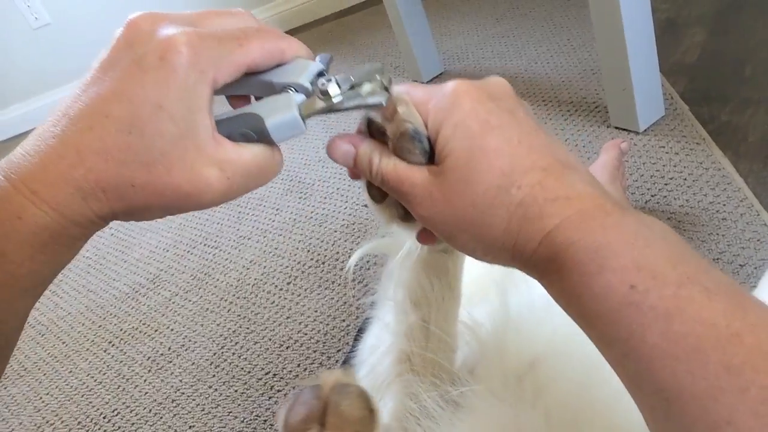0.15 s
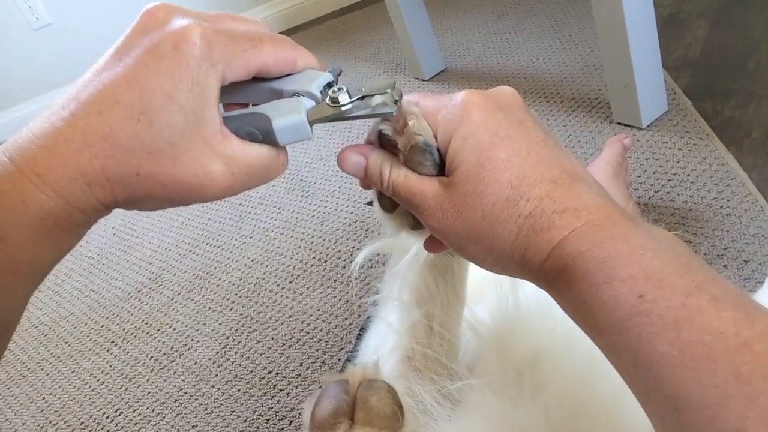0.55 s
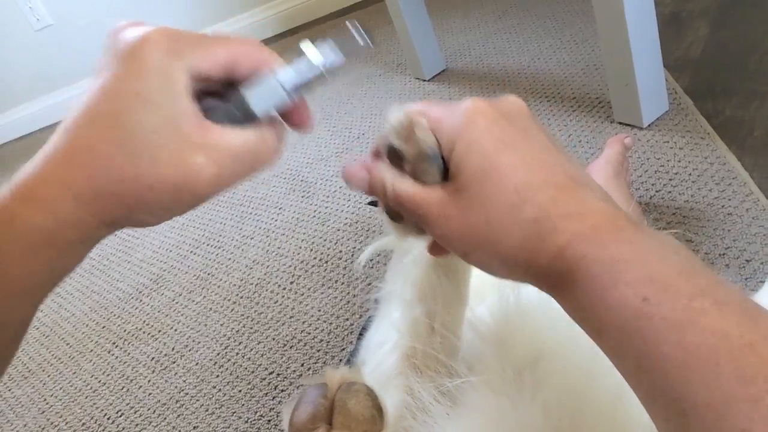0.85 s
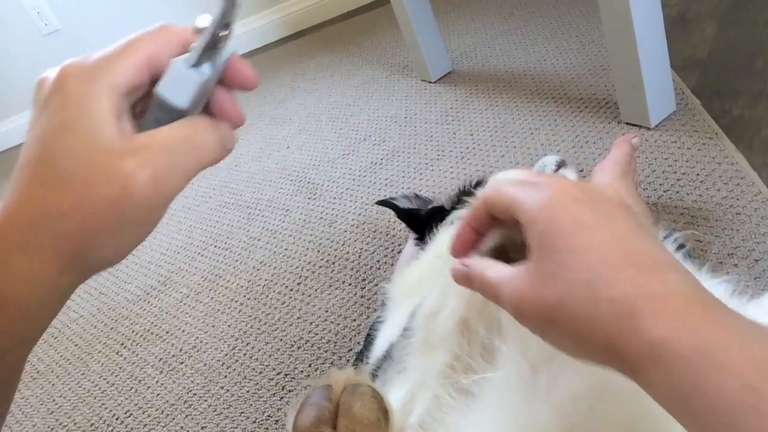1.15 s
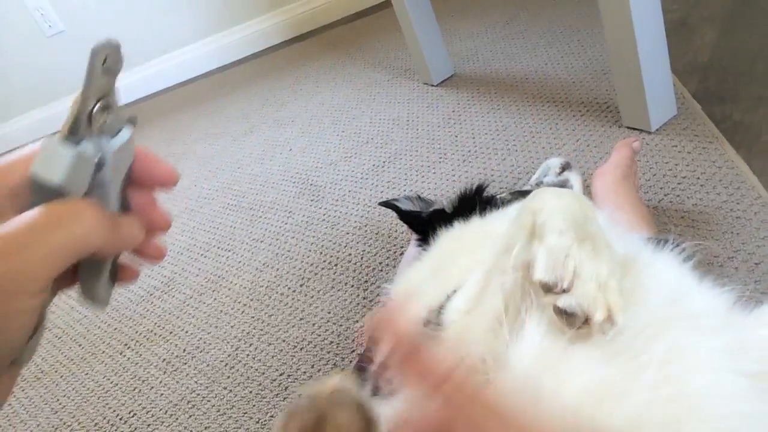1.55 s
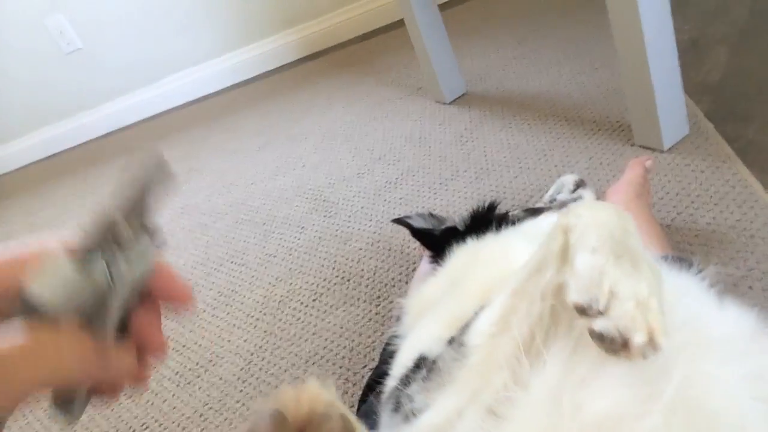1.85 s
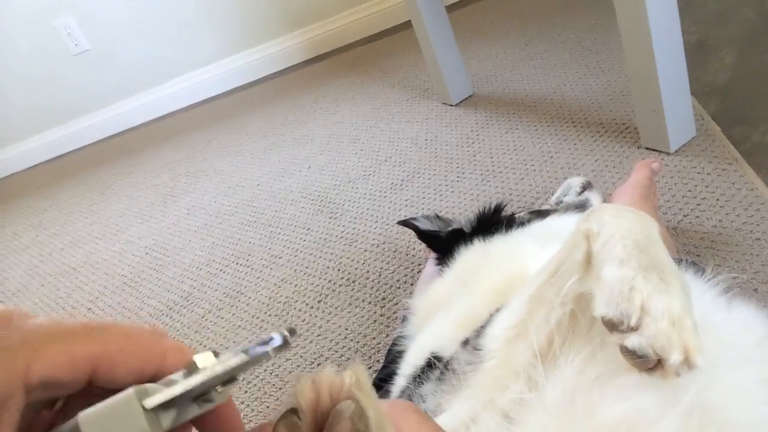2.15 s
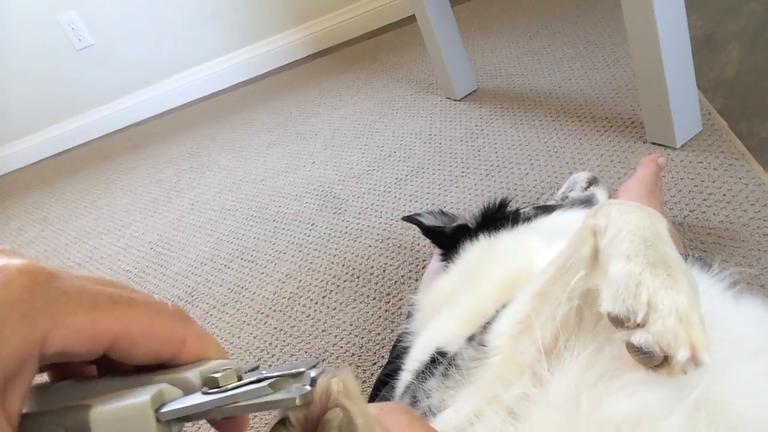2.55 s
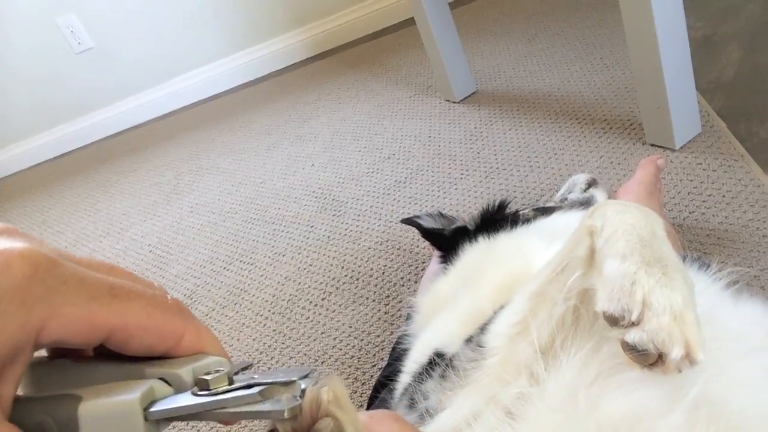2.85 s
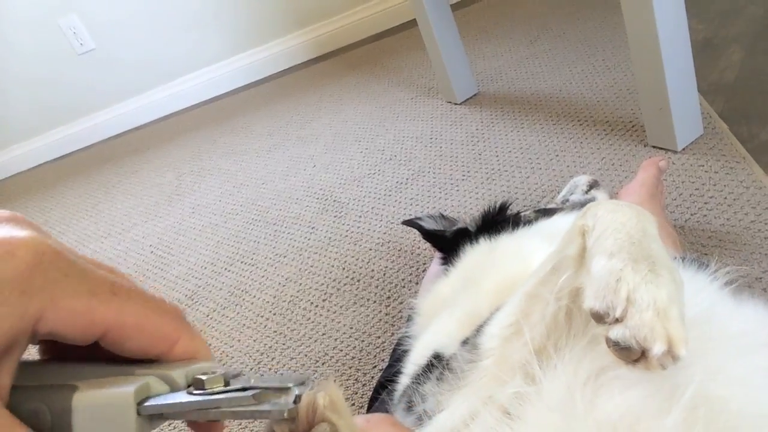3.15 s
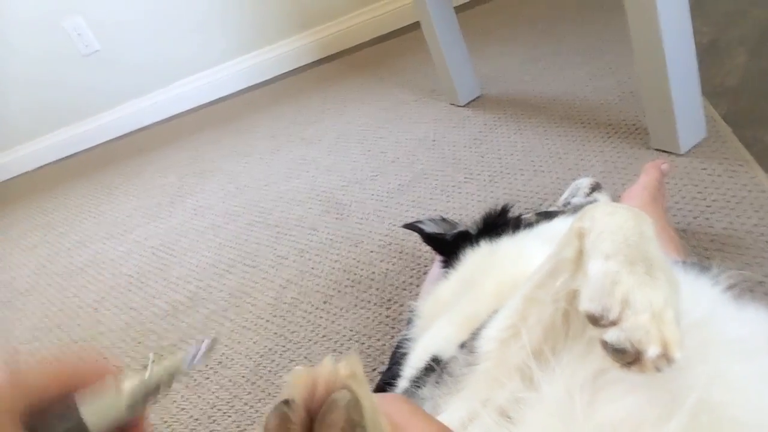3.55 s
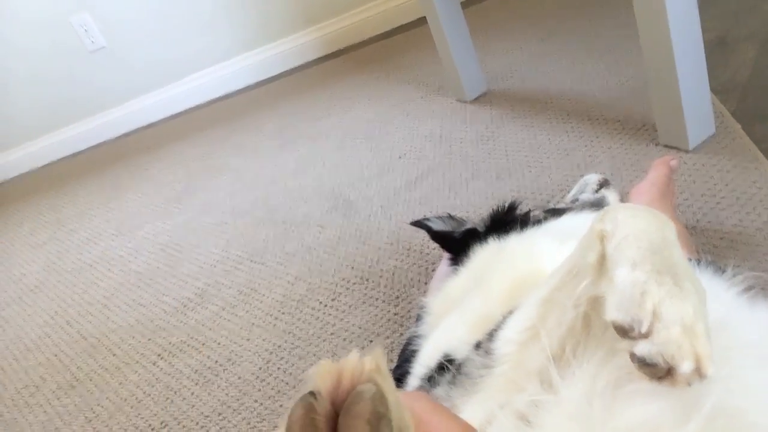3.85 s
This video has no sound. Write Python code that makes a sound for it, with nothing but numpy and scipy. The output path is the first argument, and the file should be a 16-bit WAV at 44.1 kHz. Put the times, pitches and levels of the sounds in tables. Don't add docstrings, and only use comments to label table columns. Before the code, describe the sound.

Pet nail clippers close to a phone: one small bright snip, hands brushing fur, near quiet, a hard crunchy clip with a steel snap, then a dull thud and clack on the carpeted floor, over faint house hum.

```python
import sys
import numpy as np
from scipy import signal
from scipy.fft import rfft, irfft
from scipy.io import wavfile
from scipy.ndimage import uniform_filter1d

SR = 44100
rng = np.random.default_rng(int(sys.argv[2]) if len(sys.argv) > 2 else 0)


def int16_out(signal):
    q = np.round(np.clip(np.atleast_2d(signal).T, -1, 1) * 32767)
    wavfile.write(sys.argv[1], SR, q.astype(np.int16))


def amplitude_ratio(level_db):
    exponent = np.asarray(level_db, float) / 20
    return 10 ** exponent


N = 176400


def band(x, hz, width_hz):
    return signal.lfilter(*signal.iirpeak(hz, hz / width_hz, fs=SR), x)


def band_twice(x, hz, width_hz):
    return band(band(x, hz, width_hz), hz, width_hz)


def unit(x):
    return x / np.sqrt(np.mean(x ** 2))


def walk(rate_hz):
    hold = int(SR / rate_hz)
    steps = np.repeat(rng.standard_normal(N // hold + 1), hold)
    return 1.58 * uniform_filter1d(uniform_filter1d(steps, hold), hold)[:N]


def curve(points):
    return np.interp(np.arange(N) / SR, *np.array(points).T)


def coloured(points):
    hz, db = np.array(points).T
    f = np.maximum(np.arange(N // 2 + 1) * SR / N, 1)
    gain = amplitude_ratio(np.interp(np.log(f), np.log(hz), db))
    return unit(irfft(rfft(rng.standard_normal(N)) * gain, N))


def add(out, s, peak_db, shape):
    i = int(s * SR)
    out[i:i + len(shape)] += (amplitude_ratio(peak_db) * shape / np.abs(shape).max())[:N - i]


WAVER_DB = 1.5

# f/Hz, density/dB per Hz
FLOOR_SPECTRUM = [(12, -39), (25, -18), (64, -1), (144, -0.5), (282, -13.5), (315, -11), (834, -18.5),
                  (1040, -19.5), (15500, -37)]
# f/Hz, width/Hz, level/dB
HUM_MODES = [(74.6, 46, -80), (142.4, 30, -76), (200, 25, -82.5), (318.6, 38, -80), (581, 90, -81.5),
             (431, 140, -85.5)]
# t/s, level/dB
TRAFFIC = [(0.0, -78), (0.77, -71.5), (1.17, -73), (1.27, -71.5), (1.79, -72.5), (2.23, -69.5),
           (2.58, -73.5), (3.22, -68), (3.42, -73), (3.64, -69), (3.85, -71), (4.0, -68.5)]


def house():
    floor_db = -69 - 2.0
    out = coloured(FLOOR_SPECTRUM) * amplitude_ratio(floor_db + .5 * walk(2.3))
    swell_db = curve(TRAFFIC)
    swell_db = swell_db - swell_db.mean()
    for hz, width_hz, db in HUM_MODES:
        hum = unit(band(rng.standard_normal(N), hz, width_hz))
        out = out + hum * amplitude_ratio(db + WAVER_DB * walk(3.93) + (hz < 250) * swell_db)
    t = np.arange(SR // 2) / SR
    ping_hz, ping_t60_s, beat_hz, beat_depth = 588, .9, 12.5, .7
    beat = 1 - beat_depth * np.cos(2 * np.pi * beat_hz * t)
    decay = np.minimum(t / 0.0107, 1) * amplitude_ratio(-60 * t / ping_t60_s)
    add(out, 1.365, -66, np.sin(2 * np.pi * ping_hz * t) * beat * decay)
    return out


# f/Hz, t60/s, level/dB
ROOM_BANDS = [(294, 0.23, -32), (900, 0.16, -42), (2300, 0.44, -33), (4800, 0.44, -42), (7000, 0.39, -40),
              (10000, 0.33, -39), (13000, .33, -40)]


def room(x):
    gap_s = 0.0023
    t = np.arange(SR // 2) / SR
    tail = np.zeros(len(t))
    for hz, t60_s, db in ROOM_BANDS:
        noise = band(band(rng.standard_normal(len(t)), hz, hz * 1.16), hz, hz * 1.03)
        tail += unit(noise) * amplitude_ratio(db - 22.0 - 60 * t / t60_s)
    return signal.fftconvolve(x, tail * np.clip(t / gap_s - 1, 0, 1))[:N]


# t/s, level/dB
HAND_LEVEL = [(0, -87.5), (.6, -85.5), (.9, -79), (1.1, -75.5), (1.35, -76), (1.55, -73.5), (1.7, -75.5),
              (1.9, -79.5), (2.2, -85), (2.5, -89), (3.1, -85), (3.5, -76), (3.9, -82)]
# f/Hz, density/dB per Hz
FUR_SPECTRUM = [(400, -21), (800, -4), (1200, -4), (2500, -13), (7600, -9.5), (8500, -14.5), (15000, -16.5),
                (16000, -33.5)]
# t/s, length/s, level/dB, f/Hz, width/Hz
STROKES = [(0.858, 0.029, -87, 4480, 1500), (1.011, 0.013, -81, 4700, 700), (1.118, 0.038, -85, 7000, 9000),
           (1.22, .03, -76, 1610, 1500), (1.45, 0.03, -78, 1050, 400), (1.551, 0.05, -75, 3500, 3000),
           (1.332, 0.063, -79, 4490, 5000), (.78, .025, -80, 1082, 500), (1.748, 0.0091, -72, 8400, 9000),
           (1.758, 0.04, -78.5, 2500, 3000), (1.88, .04, -88, 6000, 5000), (2.11, 0.059, -76, 6500, 3000),
           (2.1, 0.056, -86, 11500, 4000), (3.512, 0.0176, -91, 11550, 4000),
           (3.499, 0.049, -79.5, 2230, 1215), (3.679, 0.079, -79, 800, 1000)]


def rustle():
    hiss = coloured(FUR_SPECTRUM) * amplitude_ratio(curve(HAND_LEVEL) + .6 * WAVER_DB * walk(60))
    grain = amplitude_ratio(1.4 * WAVER_DB * walk(200))
    t = np.arange(-SR // 4, SR // 4) / SR
    strokes = np.zeros(N)
    for s, length_s, db, hz, width_hz in STROKES:
        noise = unit(band_twice(rng.standard_normal(len(t)), hz, width_hz))
        add(strokes, s + t[0], db + 8.5, noise * np.exp(-.5 * (t / length_s) ** 2))
    return hiss + strokes * grain


# t/s, peak/dB, f/Hz, width/Hz
TICK_EVENTS = [(.133, -47.5, 1020, 630), (.133, -55, 3500, 1500), (.728, -53, 6500, 5000),
               (.8555, -57.5, 8500, 8000), (.8597, -62, 10500, 5000), (.871, -62, 7500, 7000),
               (.881, -65.5, 2100, 900), (.886, -60, 6000, 7000), (.8985, -53, 5660, 1500),
               (.8983, -50, 10500, 5000), (.8985, -57, 1600, 900), (.9018, -58, 10000, 4000),
               (2.444, -50.5, 1060, 794), (3.086, -62, 6500, 4000), (3.13, -63, 6000, 3978),
               (3.174, -60, 6200, 3000), (3.2483, -63, 8000, 8000), (3.2515, -59, 1100, 900),
               (3.256, -61.5, 1500, 900), (3.667, -47.5, 7680, 1600), (3.667, -54, 10450, 2500),
               (3.667, -57, 4300, 2200), (3.6669, -46, 1040, 1308), (3.9525, -57.5, 3800, 3000),
               (3.971, -56.5, 3500, 3500), (3.9819, -21, 1750, 1150), (3.9824, -25.5, 1000, 1100),
               (3.982, -30.5, 3000, 1500), (3.982, -33, 4600, 1200), (3.9925, -41, 3500, 1200),
               (3.982, -23.5, 6800, 3000), (3.982, -26.5, 11200, 3000)]


def ticks():
    grit_db, grit_s, clean_above_db = -14, .0004, -40
    out, k = np.zeros(N), np.arange(800)
    click = k == 0
    for s, db, hz, width_hz in TICK_EVENTS:
        grit = amplitude_ratio(grit_db) * rng.standard_normal(800) * np.exp(-k / SR / grit_s)
        add(out, s, db, band_twice(click + (db < clean_above_db) * grit, hz, width_hz))
    return out


# t/s, peak/dB, f/Hz
THUD_EVENTS = [(3.955, -16.5, 448), (3.9647, -30, 417), (3.9705, -35, 540), (3.9727, -33, 520),
               (3.976, -41, 490), (3.9841, -19.5, 399), (3.995, -30.5, 700), (3.285, -52, 74),
               (3.943, -58, 520), (3.9502, -52, 490), (3.9573, -33, 450), (3.9903, -36, 218),
               (3.9552, -32, 213), (3.983, -55.5, 320), (3.9535, -42, 763)]


def thuds():
    width_cycles, lead_cycles = 0.48, .05
    rumble_db, rumble_t60_s = -31.5, 0.074
    out, t = np.zeros(N), np.arange(-SR // 40, SR // 10) / SR
    for s, db, hz in THUD_EVENTS:
        cycles = t * hz
        push = -np.cos(2 * np.pi * cycles) * np.exp(-.5 * ((cycles + lead_cycles) / width_cycles) ** 2)
        rumble = unit(band_twice(rng.standard_normal(len(t)), hz, 400))
        decay = np.clip(cycles, 0, 1) ** 2 * amplitude_ratio(rumble_db - 60 * np.abs(t) / rumble_t60_s)
        add(out, s + t[0], db, push + rumble * decay)
    return out


def struck(events, modes, grip_s):
    rise_s, splinter_db, splinter_s = .0004, -11.5, 0.00051
    out, t = np.zeros(N), np.arange(2000) / SR
    hz, db, t60_s = np.array(modes).T[:, :, None]
    sign = (-1.) ** np.arange(len(hz))[:, None]
    envelope = np.minimum(t / rise_s, 1) ** 2 * amplitude_ratio(-60 * (t / grip_s) ** 2)
    for s, peak_db, tilt_db_per_octave in events:
        f = hz * (1 + .006 * rng.standard_normal(hz.shape))
        gain = amplitude_ratio(db + tilt_db_per_octave * np.log2(hz / 3000))
        ring = (sign * gain * amplitude_ratio(-60 * t / t60_s) * np.sin(2 * np.pi * f * t)).sum(axis=0)
        burst = rng.standard_normal(len(t)) * np.exp(-t / splinter_s)
        splinter = sum(g * band(burst, h, h / 3) for g, h in zip(gain[:, 0], hz[:, 0]))
        add(out, s - rise_s, peak_db, (ring + amplitude_ratio(splinter_db + 10.5) * splinter) * envelope)
    return out


# f/Hz, level/dB, t60/s
NIP_RING = [(600, -21, 0.011), (1900, -5, 0.0125), (2290, 1, 0.00826), (3000, 1, 0.0043),
            (4020, -0.5, 0.0061), (4700, -2, 0.00444), (6250, -5, 0.0176), (8000, -18, .003),
            (10470, -19, 0.0033)]
# t/s, peak/dB, tilt/dB per octave
NIP_EVENTS = [
    (.8183, -30, -1),
    (.8212, -61, 0),
    (.829, -64, -3),
]


def nips():
    return struck(NIP_EVENTS, NIP_RING, grip_s=0.00715)


# f/Hz, level/dB, t60/s
JAW_RING = [(600, -9.5, 0.006), (1660, -11, .008), (2315, -2.5, 0.024), (3000, -5.5, .007),
            (4230, -6.5, 0.011), (5700, -12, .008), (6450, -4.5, 0.013), (6970, -8.5, 0.0049),
            (7880, -2, 0.0084), (9000, -14.5, 0.004), (10750, -14.5, 0.0035), (14200, -34, .002)]
# t/s, peak/dB, tilt/dB per octave
JAW_STRIKES = [(3.2893, -37.5, -3.5), (3.2912, -37, 3.5), (3.2962, -40.5, -3.5), (3.2986, -16, 3),
               (3.3095, -46, -4), (3.3148, -40, -6), (.8235, -57, -7), (.8285, -50, -9), (.8355, -54, -9),
               (.844, -54, -11), (.858, -63, -8), (.866, -63, -6), (3.998, -32, -4)]


def jaws():
    return struck(JAW_STRIKES, JAW_RING, grip_s=0.011)


# f/Hz, level/dB, t60/s
NAIL_RING = [(1000, -0.5, 0.0096), (1720, -8, 0.0053), (2370, -4, 0.0065), (3600, -13, 0.0097),
             (4650, -7.5, 0.0056), (5500, -13, 0.0076), (6800, -4, 0.011), (7250, -5.5, 0.0073),
             (8650, -7, 0.0076), (10700, -10, .008), (12100, -17.5, .007), (13600, -28, .004)]
# t/s, peak/dB, tilt/dB per octave
DRY_CRACKS = [(3.2618, -52, -2), (3.2645, -52, -0.5), (3.2668, -49.5, -1.5), (3.2757, -39, -4),
              (3.2781, -14, 0), (3.2793, -26, 0), (3.2822, -44, -4), (3.2855, -42, -1),
              (3.3131, -26.5, -1.5), (3.3240, -33, 1), (3.3257, -39.5, -2.5), (3.3272, -37, -3),
              (3.3290, -37.5, -4.5), (3.3315, -44, -3), (3.341, -46, 2), (3.987, -37, -2),
              (3.9918, -36.5, -2), (3.9948, -36, -4)]


def crunch():
    start_s, end_s = 3.268, 3.335
    times_s = [start_s - .03, start_s + .015, end_s, end_s + 0.033]
    gate_db = np.interp(np.arange(N) / SR, times_s, [-38, -5.0, -18.0, -44], right=-99)
    grains = rng.standard_normal(N) * amplitude_ratio(4 * walk(500))
    tone = np.zeros(N)
    for hz, db, _ in [*JAW_RING, *NAIL_RING]:
        tone += amplitude_ratio(db - 3 * np.log2(hz / 3000)) * band(grains, hz, hz / 3)
    return unit(tone) * amplitude_ratio(-51.5 + gate_db)


def cracks():
    return struck(DRY_CRACKS, NAIL_RING, grip_s=0.005)


def scene():
    scatter_depth, scatter_hz = 1.5, 1500
    dull = ticks() + thuds() + crunch()
    snips = cracks() + jaws() + nips()
    scattered = snips * (1 + scatter_depth * walk(scatter_hz)) / np.hypot(1, scatter_depth)
    return (dull + snips + room(dull + scattered) + rustle() + house())[None]


def roll_off(x):
    return signal.sosfilt(signal.butter(12, 16260, fs=SR, output="sos"), x)


def record(dry):
    ceiling, knee, top_hz = .185, 6, 14950
    limited = dry / (1 + np.abs(dry / ceiling) ** knee) ** (1 / knee)
    low_pass = signal.ellip(8, .2, 60, top_hz, fs=SR, output="sos")
    mix = signal.sosfilt(low_pass, limited)
    return roll_off(mix)


dry = scene()
out = record(dry)
int16_out(out)
```